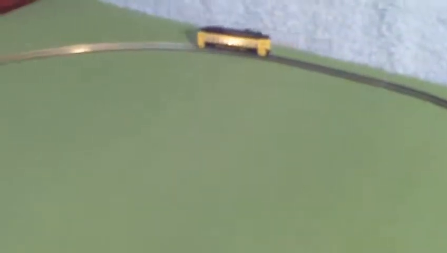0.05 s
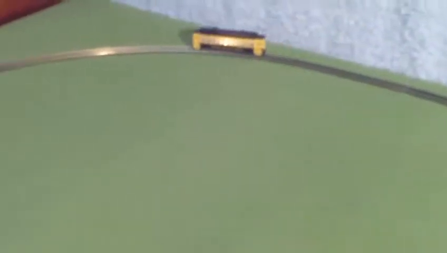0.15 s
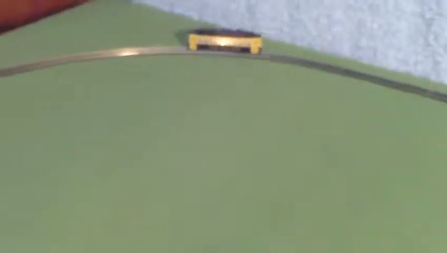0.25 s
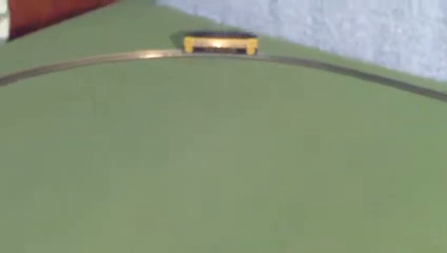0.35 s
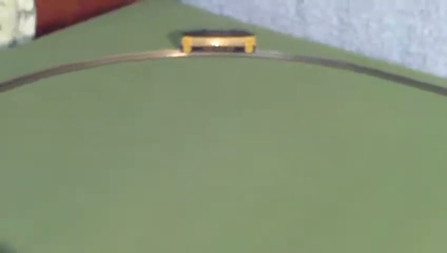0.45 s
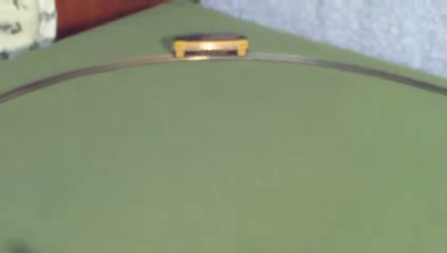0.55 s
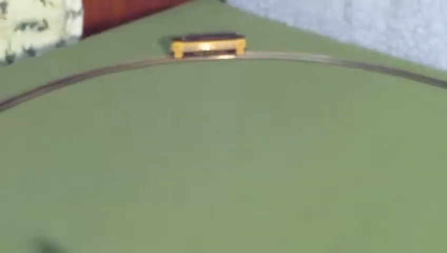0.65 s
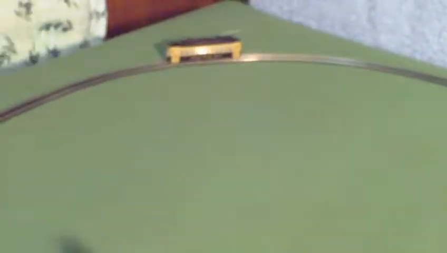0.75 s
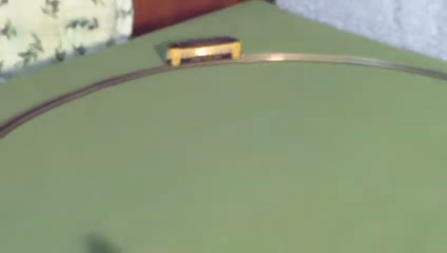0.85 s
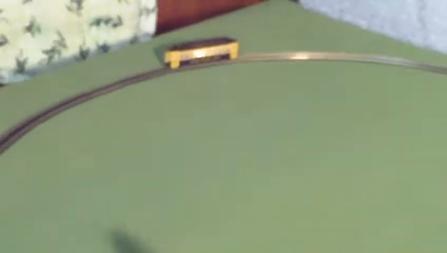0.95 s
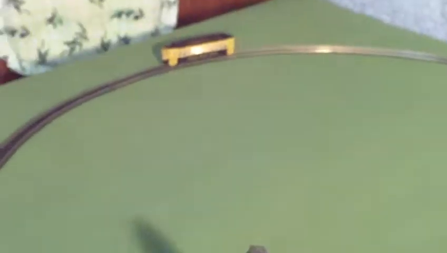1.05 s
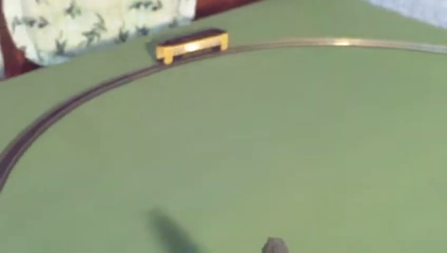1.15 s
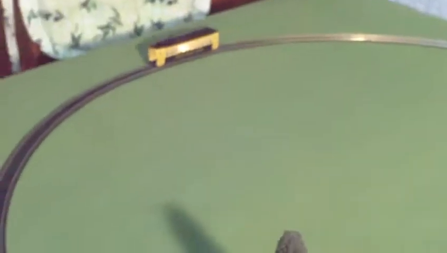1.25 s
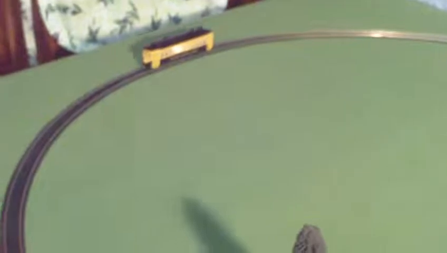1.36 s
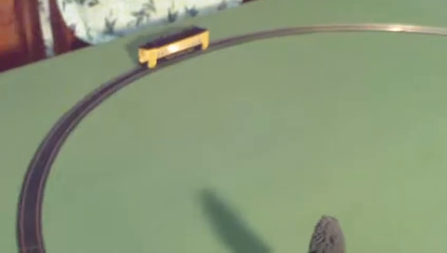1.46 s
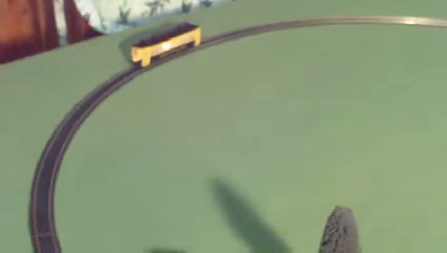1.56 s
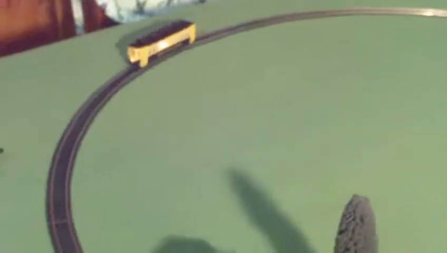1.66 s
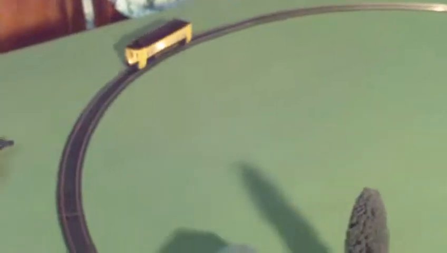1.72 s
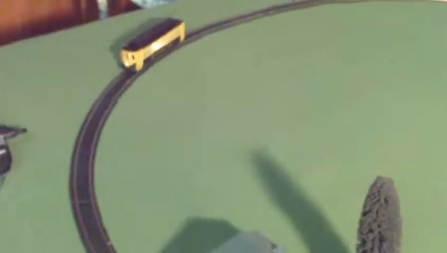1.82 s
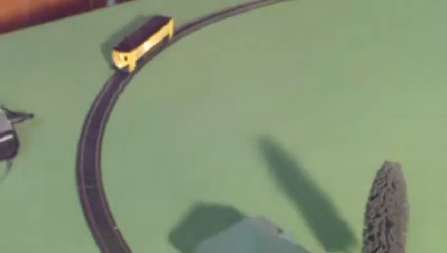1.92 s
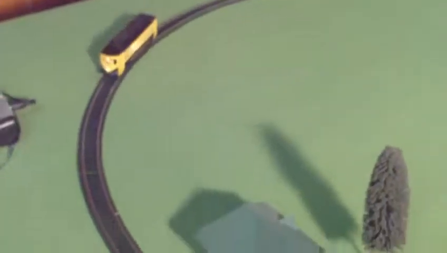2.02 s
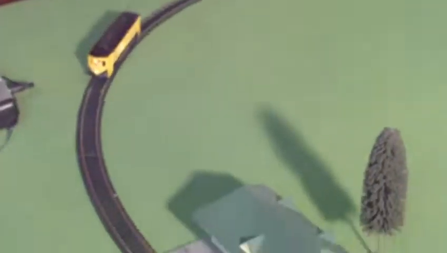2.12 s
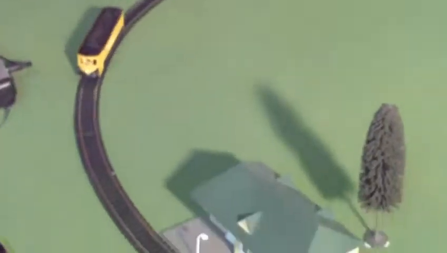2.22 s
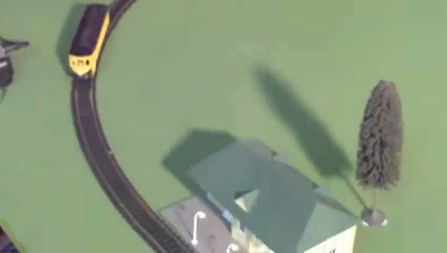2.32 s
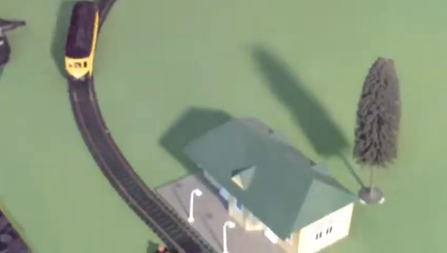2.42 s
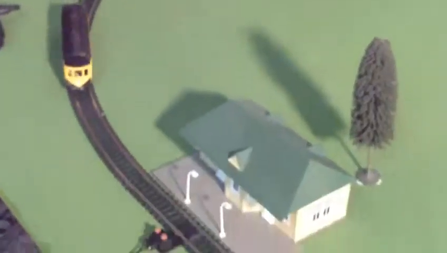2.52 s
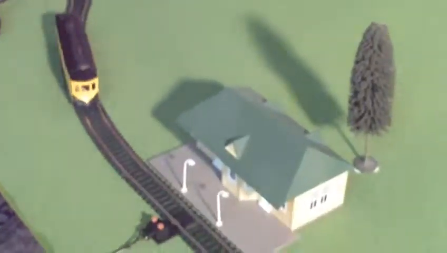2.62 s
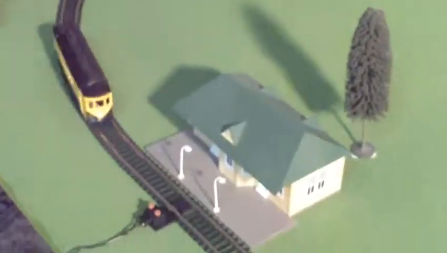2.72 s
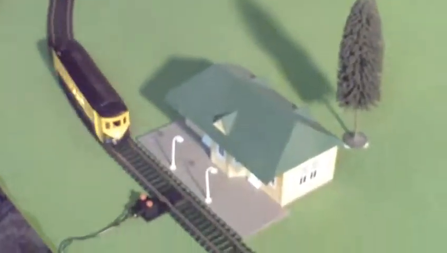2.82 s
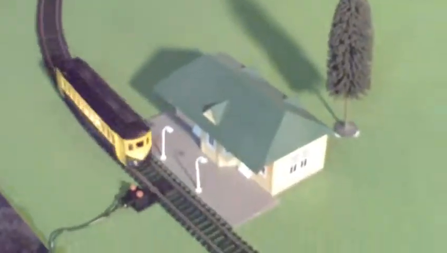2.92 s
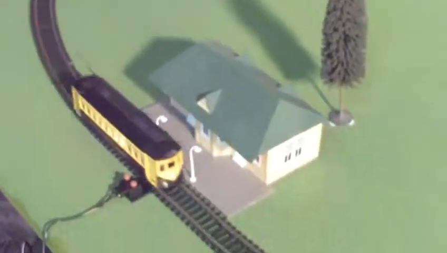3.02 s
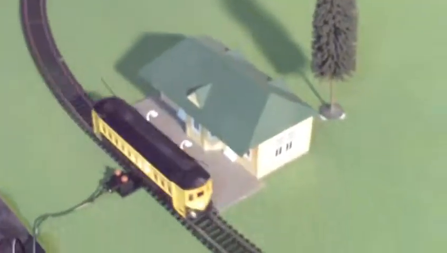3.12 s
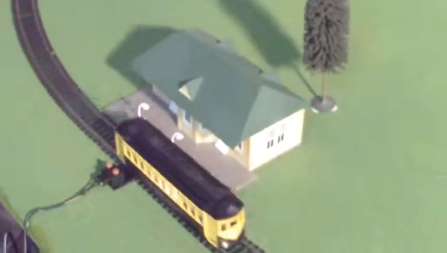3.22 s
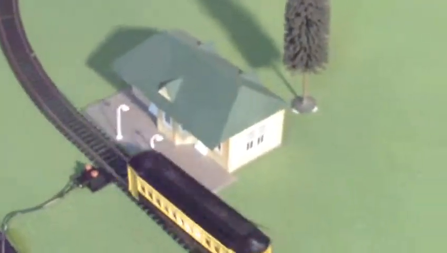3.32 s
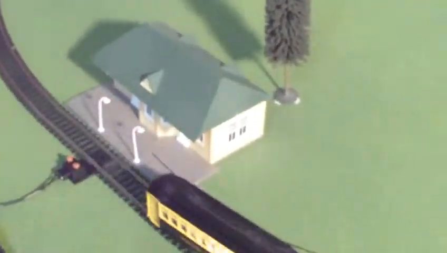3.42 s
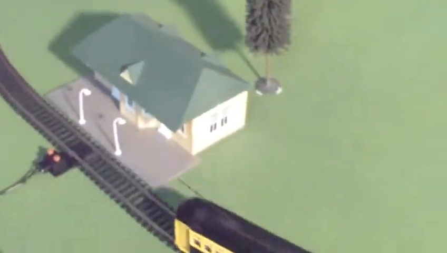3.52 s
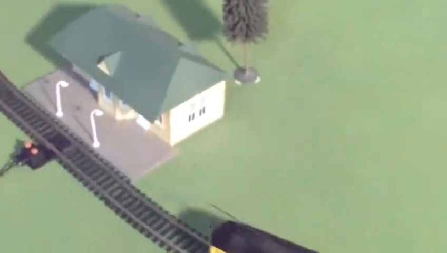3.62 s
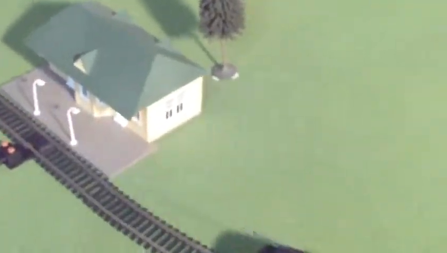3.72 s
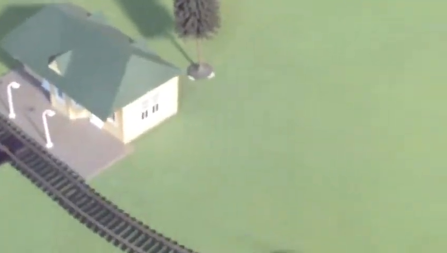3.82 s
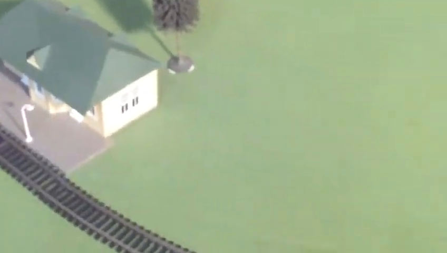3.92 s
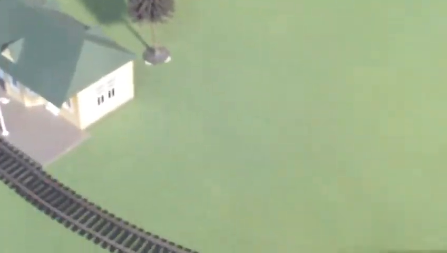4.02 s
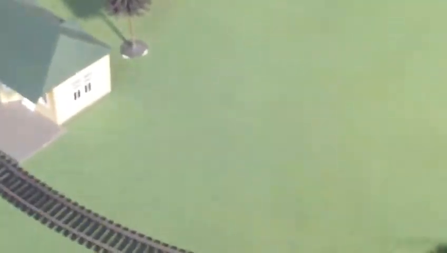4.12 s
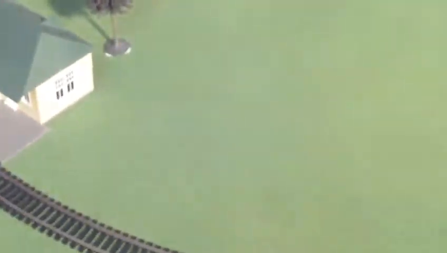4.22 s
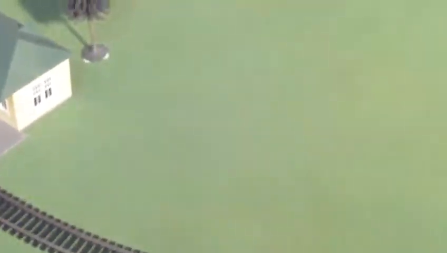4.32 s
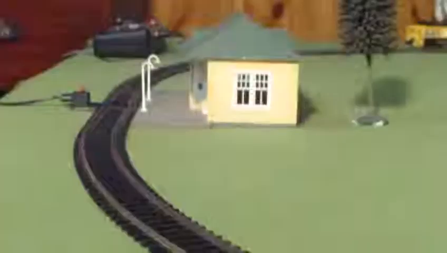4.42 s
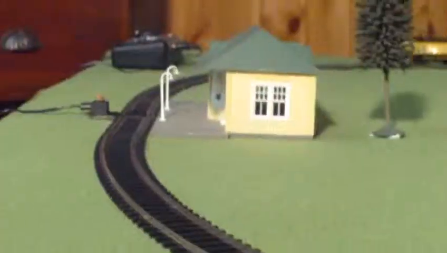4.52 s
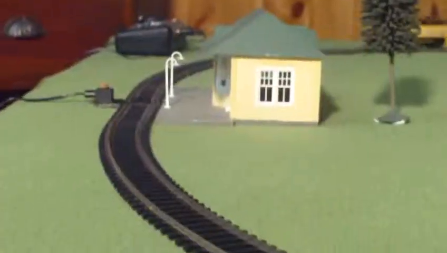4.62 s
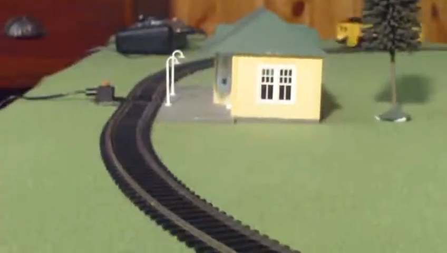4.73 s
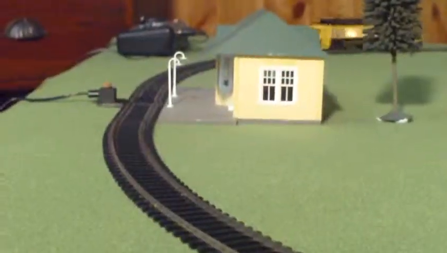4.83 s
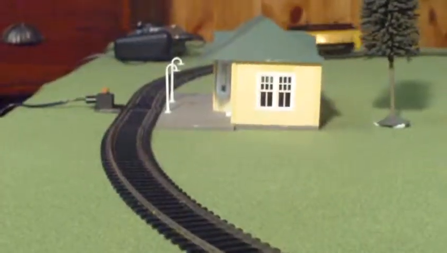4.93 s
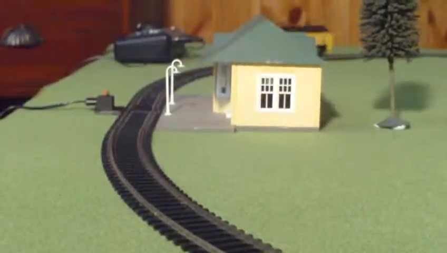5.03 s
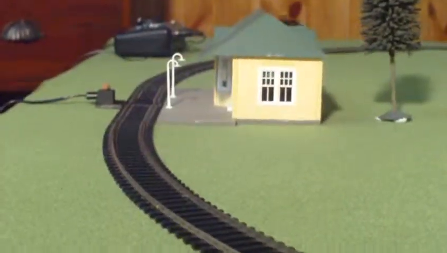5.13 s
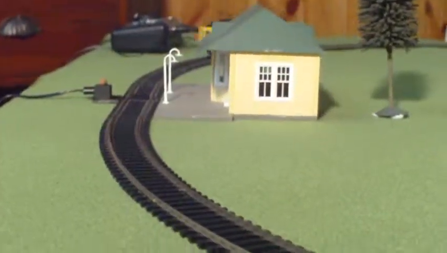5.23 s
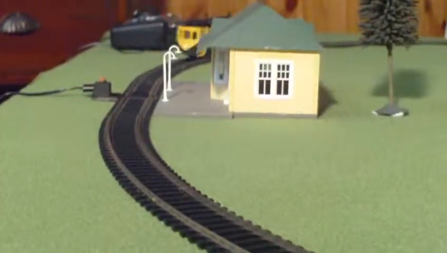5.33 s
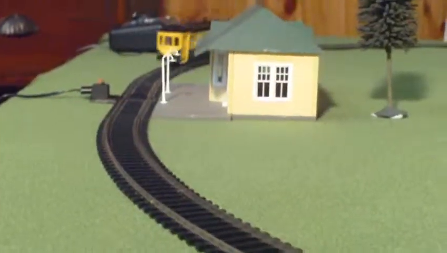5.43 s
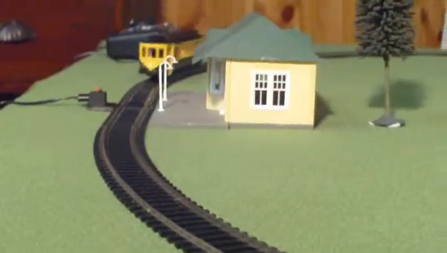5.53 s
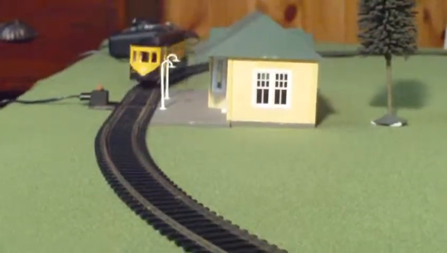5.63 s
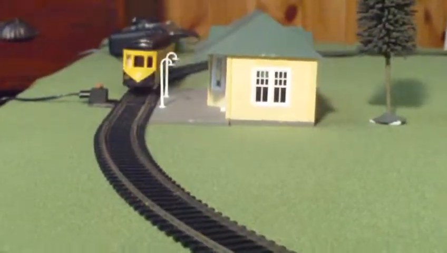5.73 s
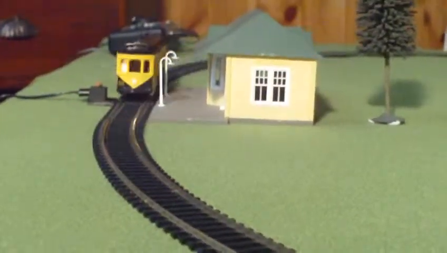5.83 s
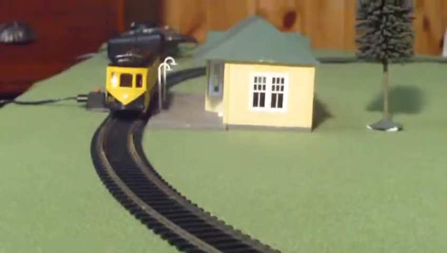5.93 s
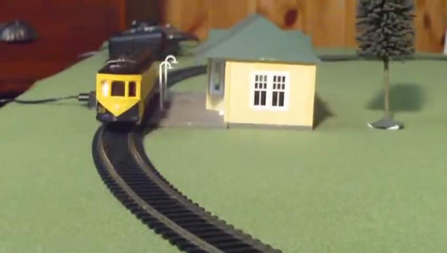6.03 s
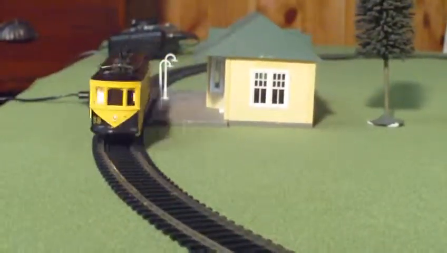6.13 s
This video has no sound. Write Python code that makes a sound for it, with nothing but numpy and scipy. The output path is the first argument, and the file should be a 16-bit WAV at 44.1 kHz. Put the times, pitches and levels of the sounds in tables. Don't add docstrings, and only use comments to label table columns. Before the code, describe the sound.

Continuous bright rattling of a toy tram's wheels and gears, full of tiny irregular ticks, first ringing thinly on a far curve, then wider and sharper as it passes one close indoor microphone. A very short gap marks a change of place. The rattle resumes with more hollow board drumming, one woody clack on a rail joint, then swells as the tram comes straight on, its level briefly dipping after the hardest clatter.

```python
import sys
import numpy as np
from scipy import signal
from scipy.io import wavfile
from scipy.ndimage import uniform_filter1d

SR = 44100
rng = np.random.default_rng(int(sys.argv[2]) if len(sys.argv) > 2 else 0)


def makeup_ratio(level_db):
    decades = np.asarray(level_db, float) / 20
    return 10 ** decades


def wrap_up_sound(samples):
    columns = np.atleast_2d(samples).T
    tamed = np.clip(columns, -1, 1)
    steps = np.round(tamed * 32767).astype(np.int16)
    wavfile.write(sys.argv[1], SR, steps)


N = 271656
T = np.arange(N) / SR
RESUME_S = 4.4985

# (time [s], level [dB])
RUN = [(0.0, -25), (0.15, -21.5), (0.6, -25), (1.05, -22), (1.5, -24.5), (1.65, -20), (2.3, -22),
       (2.6, -21), (3.25, -20), (3.5, -17), (3.74, -19.5), (4.19, -19.5), (4.49, -22.5), (4.75, -23),
       (4.94, -21), (5.3, -21), (5.84, -17.5), (6.16, -16)]
# (time [s], pose [0 far, 1 passing, 2 behind the house, 3 head-on])
POSE = [
    (0, 0.63),
    (1.9, 0.64),
    (2.9, 0.73),
    (4.49, 1.35),
    (4.495, 1.93),
    (5.3, 2.28),
    (5.65, 3.07),
    (6.2, 2.9),
]


def evened(x):
    return x / np.sqrt(np.mean(x ** 2) + 1e-20)


def column(rows, t, count):
    return np.interp(t, [r[0] for r in rows], [r[count] for r in rows])


def read(points, hz):
    f, value = np.transpose(points)
    return np.interp(np.log(hz + 1), np.log(f + 1), value)


def patches(shape, bins, frames):
    field = rng.standard_normal(shape[::-1]).T
    field = uniform_filter1d(field, bins, 0)
    return evened(uniform_filter1d(field, frames, 1))


def resonate(x, hz, width):
    turn = np.exp(2j * np.pi * np.cumsum(hz) / SR)
    r = np.exp(-np.pi * width / SR)
    return 2 * (turn * signal.lfilter([1 - r], [1, -r], x / turn)).real


def bells(bumps, t):
    return np.exp(-((t[:, None] - bumps[:, 0]) / (bumps[:, 2] * .0005)) ** 2)


def jolts():
    # (time [s], level over the steady rattle [dB],
    # length [ms], mode it rings [Hz])
    wheel_jolts = [(0.103, 4, 16, 4310), (0.142, 3.5, 22, 5200), (0.393, 4.5, 24, 5080), (0.465, 3, 23, 8790),
                   (0.57, 6, 15, 4910), (0.66, 10.5, 9.4, 4220), (0.69, 8, 27, 4760), (0.747, 9, 37, 3840),
                   (0.811, 6.5, 15, 3700), (0.944, 4, 15, 5680), (0.972, 5, 36, 5680), (0.997, 4.5, 14, 8870),
                   (1.058, 2, 15, 3700), (1.1, 6, 15, 8870), (1.157, 3.5, 16, 4910), (1.285, 7.5, 14, 5000),
                   (1.347, 6.5, 18, 8350), (1.257, 4.5, 24, 4910), (1.319, 5, 12, 8840), (1.4, 6, 56, 4970),
                   (1.592, 4, 26, 6550), (1.662, 5, 27, 5050), (1.771, 1.5, 24, 7200), (1.847, 8, 15, 3790),
                   (2.044, 7.5, 26, 3930), (2.085, 5, 9.8, 5760), (2.143, 4.5, 25, 4870),
                   (2.267, 5.5, 17, 8790), (2.336, 7.5, 40, 9000),
                   (2.436, 4.5, 24, 5600), (2.565, 7, 26, 10000), (2.6, 6.5, 46, 4000),
                  (2.646, 7, 16, 10300), (2.49, 6, 32, 10300), (2.687, 6, 9.6, 3960), (2.827, 9, 14, 10800),
                  (2.847, 8, 21, 9100), (2.925, 6.5, 16, 4340), (2.993, 5, 36, 8440), (3.029, 6, 26, 4310),
                  (3.126, 4, 37, 5000), (3.221, 5, 23, 7580), (3.281, 4, 14, 5600), (3.371, 8, 16, 7490),
                  (3.457, 7, 10, 6980), (3.506, 6.5, 20, 8400), (3.606, 4.5, 11, 8440),
                  (3.656, 4.5, 46, 7460), (3.761, 4.5, 20, 8610), (3.852, 3.4, 28, 3790),
                  (3.914, 9, 12, 8600), (3.948, 8, 27, 5350), (4.042, 6.5, 19, 8100), (4.166, 6, 46, 3620),
                  (4.224, 5, 11, 8900), (4.28, 6.5, 15, 5140), (4.305, 3.5, 39, 5080),
                  (4.369, 4.5, 20, 6800), (4.465, 4, 27, 6550),
                   (4.646, 6, 20, 3700), (4.816, 4, 15, 4820), (4.966, 3, 17, 5510), (5.196, 3, 7.4, 5170),
                  (5.227, 6.5, 11, 5200), (5.306, 5, 15, 5340), (5.372, 6, 13, 8100), (5.475, 4, 33, 8270),
                  (5.657, 7, 24, 7580), (5.706, 7.5, 20, 6840), (5.755, 6, 52, 8800), (5.795, 5, 19, 7410),
                  (5.826, 6, 35, 5510), (5.863, 3.5, 25, 5360), (5.954, 4.5, 18, 6850),
                  (5.987, 6, 9.5, 5540), (6.1, 3, 81, 6890)]
    return np.array(wheel_jolts)


def contact(per_s=300, spread_db=2.0, ring_s=.001, share=.42):
    # (time [s], level over it [dB])
    sharp_knocks = [(0.465, 1.5), (0.657, 2), (0.6897, 3.5), (0.8525, 3.5), (0.9355, 3.5), (1.3187, 4.5),
                    (2.002, 3.5), (2.1395, 3.5), (2.1788, 3.5), (2.3366, 3), (2.6893, 3.5), (2.992, 3),
                    (3.0283, 7), (3.1272, 5.0), (3.1355, 3), (3.144, 6), (3.2806, 2), (3.3602, 2),
                    (3.4003, 6), (3.474, 7), (3.6057, 3), (3.9133, 2), (3.949, -1), (3.978, 12),
                    (4.0302, 4.0), (4.0424, 7), (4.2253, 4.0), (4.283, 5), (4.306, 12), (4.3666, 4.0),
                    (4.4576, 0), (4.4712, 4.0), (4.5786, 5), (4.5884, 8), (4.816, 1.5), (4.9033, 4.0),
                    (4.936, 9), (4.986, 5), (5.057, 4), (5.1954, 2), (5.2255, 2), (5.3734, 4), (5.5115, 10),
                    (5.6587, -1), (5.6989, 4.5), (5.7074, 2), (5.7527, 2), (5.7869, 3.5), (5.8006, 6.5),
                    (5.8646, 6.5), (5.8746, 9), (5.897, 3), (5.9281, 6), (5.9445, 8), (5.9557, 3.5),
                    (5.9647, 10), (5.9755, -1), (5.989, 4.5), (6.0055, 9), (6.0993, 7)]
    strength = makeup_ratio(spread_db * np.minimum(rng.exponential(1, N), 4))
    knocks = strength * (rng.random(N) < per_s / SR)
    u = np.arange(600) / SR / ring_s
    chatter = np.sqrt(np.abs(signal.oaconvolve(knocks ** 2, u * np.exp(-u))[:N]))
    hard = np.clip(share + 0.12 * (column(POSE, T, count=1) > 2.5), 0, 1)
    grain = 1 - hard + hard * evened(chatter)
    grain /= uniform_filter1d(uniform_filter1d(grain ** 2, size=300), size=300) ** 0.5
    sharp_db = sum(.8 * db * np.exp(-((T - s) / .0013) ** 2) for s, db in sharp_knocks)
    when, db = np.transpose(sharp_knocks)
    ticks = np.zeros(N)
    ticks[np.round(when * SR).astype(int)] = 4 * makeup_ratio(db)
    blow = rng.choice([-1., 1.], 90) * np.exp(-np.arange(90) / 24)
    ticks = signal.oaconvolve(ticks, blow / np.linalg.norm(blow))[10:N + 10]
    return grain * makeup_ratio(sharp_db) * rng.standard_normal(N) + ticks


def rattle(bumps, patchy_db=.8, ring_hz=330, ring_gain=.9, flicker_db=2.0, bright_db=0.2):
    # (frequency [Hz], level [dB per Hz])
    pose_colours = [
        [(760, -47), (1300, -42), (1940, -9), (2560, -20), (3750, 4), (5000, -2), (6020, -5.5), (8540, 2.5),
         (9470, -2), (11500, -8.5), (15200, -27)],
        [(760, -45), (1300, -19.5), (1700, -13.5), (2340, -15.5), (3180, -2), (6210, -3), (7470, -0.5),
         (8720, 0), (9570, -6.5), (11200, -6), (15200, -15.5)],
        [(760, -37), (1300, -13), (1940, -19), (2870, -13.5), (3210, -6.5), (5380, -0.5), (6400, -7),
         (7030, -2.5), (8030, -5.5), (8990, -10.5), (15200, -22.5)],
        [(760, -44), (1300, -27), (2640, -25), (2900, -17.5), (4290, -4.5), (5600, -2), (6270, -10.5),
         (6880, 0), (7710, -5), (9090, -3.5), (15200, -25)],
    ]
    # (frequency [Hz], width [Hz], level in poses 0, 1, 2, 3 [dB each])
    shell_modes = [(3230, 180, -11, -5, -2, 8), (4344, 110, 15.5, -2, -7, 6.5),
                   (4910, 145, 22, 4.5, -5, -4), (5700, 160, 2, 6.5, 1, 5), (6600, 530, 1.5, 1.5, 1, 5.5),
                   (7590, 420, 7.5, 3, 2, 2.5), (12000, 370, 2, -10.5, -2, -3),
                   (8830, 740, 0.5, 1.5, 3.5, 5), (10300, 530, 1, 3, 2, -0.5),
                   (11500, 720, -1.5, 4.5, 3, 1.5), (14000, 520, 8, -6, -4, 1), (15100, 1000, -6, 1, 1, 1)]
    # (time [s], level [dB], length [ms])
    nudges = [(0.229, 6, 10), (0.248, 4, 15), (0.422, 4, 10), (0.514, 5, 13), (0.585, 3.5, 30),
              (0.716, 8, 13), (0.794, 6, 15), (0.934, 2.0, 10), (0.954, 4, 23), (1.025, 3, 17),
              (1.136, 5, 18), (1.196, 5, 10), (1.332, 7, 19), (1.365, 2.5, 11), (1.442, 4, 10),
              (1.464, 2, 36), (1.541, 4, 49), (1.703, 6, 13), (1.767, 1.5, 16), (1.828, 7, 10),
              (1.889, 3, 11), (1.956, 4, 10), (2.002, 3.5, 39), (2.073, 7.5, 20), (2.176, 3.0, 18),
              (2.452, 3, 14), (2.552, 1, 17), (2.719, 7, 13), (2.776, 7, 11), (2.812, 4, 13),
              (2.884, 2.5, 27), (2.912, 3, 10), (3.009, 2, 15), (3.096, 7, 23), (3.144, 0, 13),
              (3.164, 8, 14), (3.246, 2, 28), (3.281, 2.5, 10), (3.4, 1, 17), (3.487, 6.5, 20),
              (3.565, 3, 39), (3.776, 4, 17), (3.827, 7, 14), (3.934, 4.5, 17), (4.029, 4, 26),
              (4.088, 4, 25), (4.323, 6, 13), (4.408, 6, 13), (4.547, 8, 12), (4.624, 5, 19),
              (4.936, 0.5, 17), (5.026, 5, 10), (5.268, 5, 36), (5.416, 5, 44), (5.614, 1.5, 15),
              (5.738, 6, 10), (5.801, -1, 11), (5.942, 1, 10), (6.09, 4, 9.2), (6.14, 6, 10)]
    # (time [s], level [dB], length [ms])
    lulls = [(0.052, -4, 34), (0.22, -1, 10), (0.338, -1, 21), (0.366, -4, 10), (0.559, -3.5, 27),
             (0.665, -2.5, 36), (0.732, -5, 12), (0.757, -1, 10), (0.946, -2, 13), (1.117, -3.0, 27),
             (1.187, -2.5, 23), (1.205, -2.0, 10), (1.235, -2, 25), (1.419, -4, 16), (1.498, -1.5, 33),
             (1.6, -2.0, 10), (1.635, -1, 10), (1.655, -4, 25), (1.811, -2.5, 27), (1.839, -4, 36),
             (2.212, -3, 10), (2.346, -4, 17), (2.368, -2, 10), (2.402, -2.0, 10), (2.61, -2, 20),
             (2.901, 0, 10), (2.967, -2.5, 33), (3.112, -4, 32), (3.184, 1, 13), (3.371, -6, 15),
             (3.499, -3, 10), (3.529, -3.0, 22), (3.734, -2.5, 32), (3.961, -2.5, 11), (4.037, -5.5, 27),
             (4.117, -1, 12), (4.247, -5, 12), (4.312, -6, 10), (4.451, -9, 10), (4.601, -5.5, 29),
             (4.722, -0.5, 26), (4.824, -2, 10), (4.885, -3.0, 16), (5.006, -1, 36), (5.047, -4, 17),
             (5.074, -6, 10), (5.101, -5, 25), (5.168, -6, 17), (5.295, -5, 10), (5.365, -5.5, 24),
             (5.396, -6, 10), (5.447, -3.0, 10), (5.553, -2.5, 34), (5.725, -4, 33), (5.853, 1, 24),
             (5.961, -5, 15), (5.998, -8, 15), (6.021, -1, 10), (6.042, 0, 19), (6.068, -3.0, 10)]
    hz, t, z = signal.stft(evened(contact()), SR, nperseg=256, noverlap=192)
    rings = sum(np.outer(db, 1 / (1 + (2 * (hz - f) / width) ** 2)) for f, width, *db in shell_modes)
    colours = np.array([read(c, hz) for c in pose_colours]) + rings
    colours -= 10 * np.log10(np.mean(makeup_ratio(2 * colours), axis=1))[:, None]
    pose_number = np.arange(len(pose_colours))[:, None]
    weight = np.maximum(1 - np.abs(column(POSE, t, count=1) - pose_number), 0)

    lift_db, _, mode = bumps.T[1:]
    upper = .5 * np.tanh((hz - 6300) / 900)
    struck = 1 / (1 + (2 * (hz[:, None] - mode) / ring_hz) ** 2)
    jolt_db = lift_db * (0.72 + 0.1 * upper[:, None] + ring_gain * struck)
    jolt_db += np.outer(upper, bright_db * np.tanh((mode - 6300) / 900))
    field = colours.T @ weight + jolt_db @ bells(bumps, t).T - 1.0 * upper[:, None]
    sway = np.vstack([nudges, lulls])
    field += np.outer(0.51 + 0.1 * upper, bells(sway, t) @ sway[:, 1])
    field += column(RUN, t, count=1) + patchy_db * patches(z.shape, bins=5, frames=30)
    coloured = signal.istft(z * makeup_ratio(field), SR, nperseg=256, noverlap=192)[1][:N]

    z = signal.stft(coloured, SR, nperseg=1024, noverlap=768)[2]
    z = z * makeup_ratio(flicker_db * patches(z.shape, bins=3, frames=10) - 0.78)
    return signal.istft(z, SR, nperseg=1024, noverlap=768)[1][:N]


def joint():
    # (time [s], peak level [dB])
    drop_event = (5.0568, -4)
    # (frequency [Hz], level [dB], t60 [s])
    knock_modes = [(560, 2, .018), (780, 6, .017), (1020, 2, .018), (1450, -3, .022), (1720, -1, .02),
                   (1950, -1, .02), (2400, -7, .014), (2720, -4, .014), (3050, -4, .016), (3250, 0, .018)]
    s, peak_db = drop_event
    t, out = np.maximum(T - s, 0), np.zeros(N)
    for k, (hz, db, t60) in enumerate(knock_modes):
        rise = (1 - np.exp(-t * hz)) ** 2
        out += (-1) ** k * rise * makeup_ratio(db - 60 * t / t60) * np.sin(2 * np.pi * hz * t)
    out = signal.sosfilt(signal.butter(N=4, Wn=430, btype="high", fs=SR, output="sos"), out)
    return makeup_ratio(peak_db) * out / np.abs(out).max()


def board(bumps, patchy_db=1.5):
    # (frequency [Hz], level [dB per Hz])
    board_colours = [
        [(59, -81), (100, -82), (224, -33), (253, -13), (290, -13), (418, -11), (480, -4), (520, -4.5),
         (722, 1), (1090, -1), (1280, -6), (1950, -0.5), (2600, 0.5), (3380, 3.5), (5720, -120)],
        [(59, -82), (100, -94), (243, -14), (341, -19), (442, -6.5), (613, -0.5), (839, 2), (923, 3),
         (1430, -7.5), (1640, -10), (1780, -3), (2150, -4), (2600, -0.5), (3380, -9), (5720, -120)],
    ]
    # (start [s], end [s], frequency [Hz], sag [Hz per s], level [dB], swell [dB per s])
    loose_rings = [
        (0, 2.15, 1080, -3, -57, 4),
        (2.4, 4.47, 486, 2, -55, 0),
        (4.56, 6.2, 866, 28, -39, -3.5),
    ]
    # (time [s], level [dB])
    fade_lag = [
        (4.49, 0),
        (4.5, 5),
        (4.53, 1),
        (4.57, -5),
        (4.61, 0),
    ]
    hz, t, z = signal.stft(rng.standard_normal(N), SR, nperseg=1024, noverlap=768)
    second = column(POSE, t, count=1) > 1.5
    first_db, second_db = [read(c, hz)[:, None] for c in board_colours]
    field = np.where(second, second_db - 1.0, first_db)
    field += patchy_db * patches(z.shape, bins=6, frames=12)
    drum = evened(signal.istft(z * makeup_ratio(field), SR, nperseg=1024, noverlap=768)[1][:N])

    moved = T > RESUME_S
    level_db = np.where(moved, -32, -37) + np.where(moved, 0.44, 0.055) * (column(RUN, T, count=1) + 21)
    level_db += column(fade_lag, T, count=1)
    ring = np.zeros(N)
    for start, end, ring_hz, sag, db, swell in loose_rings:
        under = np.clip(np.minimum(T - start, end - T) / .05, 0, 1)
        tone = evened(resonate(rng.standard_normal(N), ring_hz - sag * (T - start), ring_hz / 50))
        ring += under * makeup_ratio(db + swell * (T - start)) * tone
    coarse = T[::32]
    lift_db = np.interp(T, coarse, bells(bumps, coarse) @ bumps[:, 1])
    return makeup_ratio(0.11 * lift_db) * (makeup_ratio(level_db) * drum + ring)


def motor():
    # (time [s], frequency [Hz], level [dB])
    hum = [(0, 268, -48), (.3, 266, -59), (.5, 268, -53.5), (.56, 268, -69), (2.45, 261.9, -65.5),
           (2.62, 259, -59.5), (3.0, 266, -56.5), (3.08, 260, -69), (3.25, 252, -58), (3.45, 252, -69.5),
           (3.75, 255, -60), (4.0, 260, -89), (4.6, 244, -68), (5.3, 245, -68), (5.7, 252, -60),
           (6.16, 243, -66.5)]
    waver = evened(uniform_filter1d(rng.standard_normal(N), size=2000))
    turns = np.cumsum(column(hum, T, count=1) * (1 + 0.0051 * waver)) / SR
    level = makeup_ratio(column(hum, T, count=2) + 1.7 * np.roll(waver, N // 2))
    return level * np.sqrt(2) * np.sin(2 * np.pi * turns)


def bass_hiss():
    band = signal.butter(N=3, Wn=[200, 420], btype="band", fs=SR, output="sos")
    return makeup_ratio(-51) * signal.sosfilt(band, rng.standard_normal((2, N)))


def scene():
    bumps = jolts()
    mono = rattle(bumps) + joint() + board(bumps) + motor()
    return mono * makeup_ratio(np.array([[1.45], [-1.75]])) + bass_hiss()


def thinned(x):
    # (frequency [Hz], level [dB])
    side_kept = [(100, 1), (1300, 1), (2050, -1), (2150, -22), (3100, -14), (3500, -2.5), (4400, 0),
                 (9000, 0), (10500, -4), (11500, -6), (12300, -8), (12500, -30)]
    mid_side = np.array([x[0] + x[1], x[0] - x[1]]) / 2
    hz, t, z = signal.stft(mid_side, SR, nperseg=1024, noverlap=768)
    odds = np.interp(hz, [13500, 14300, 14900, 15200], [-3, -.2, -.3, -1.2])[:, None]
    odds = odds + np.interp(column(POSE, t, count=1), [0, 1, 2], [0, -.6, .4])
    z[0] *= np.where(patches(z[0].shape, bins=7, frames=9) < odds, .03, 1)
    z[1] *= makeup_ratio(read(side_kept, hz))[:, None]
    mid, side = signal.istft(z, SR, nperseg=1024, noverlap=768)[1][:, :N]
    return np.array([mid + side, mid - side])


def splice(cut_s=4.477, cut_fade_s=.011, resume_db=-16.5, hold_s=.026, fade_in_s=.058):
    out = np.clip(1 - (T - cut_s) / cut_fade_s, 0, 1) ** 3
    rise = np.clip((T - RESUME_S - hold_s) / fade_in_s, 0, 1)
    bump_db = 3 * np.exp(-((T - RESUME_S - .005) / 0.0033) ** 2)
    return np.where(T < RESUME_S, out, makeup_ratio(resume_db * (1 - rise) + bump_db))


def limiter():
    # (time [s], dip [dB], held [s], recovery [dB per s])
    clamps = [
        (5.8015, -8.5, .057, 80),
        (6.1015, -5, .07, 52),
    ]
    return makeup_ratio(sum((T > s) * (T < s + held) * (db + rate * (T - s)) for s, db, held, rate in clamps))


def top_cut(x):
    return signal.sosfilt(signal.butter(12, 15430, fs=SR, output="sos"), x)


def record(dry):
    x = thinned(dry) * splice() * limiter()
    x = x / (1 + np.abs(x / .95) ** 8) ** (1 / 8)
    x = signal.sosfilt(signal.butter(N=5, Wn=160, btype="high", fs=SR, output="sos"), x)
    x = signal.lfilter(*signal.iirnotch(7881, 50, fs=SR), x)
    edge = signal.firwin(1023, 15290, window=("kaiser", 9), fs=SR)
    x = signal.oaconvolve(x, edge[None], "same")
    return top_cut(x)


dry = scene()
out = record(dry)
wrap_up_sound(out)
```